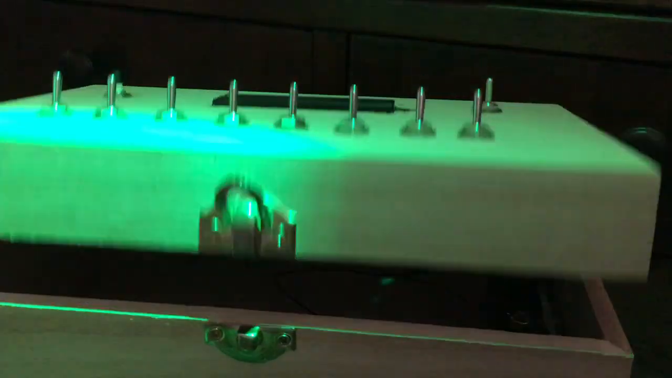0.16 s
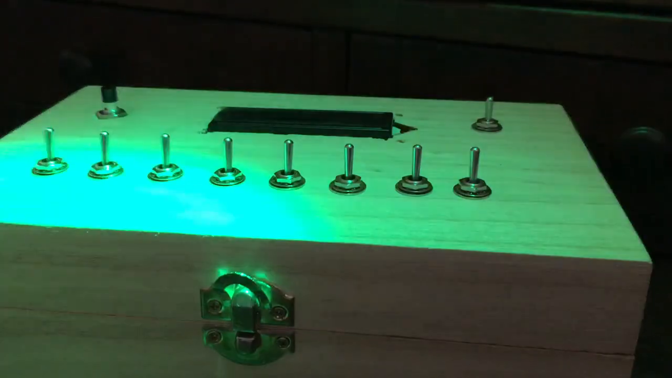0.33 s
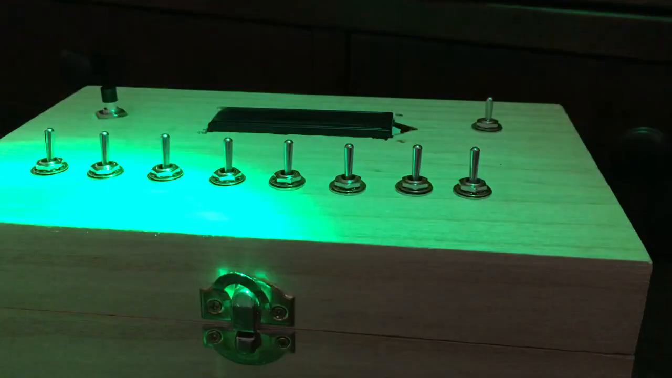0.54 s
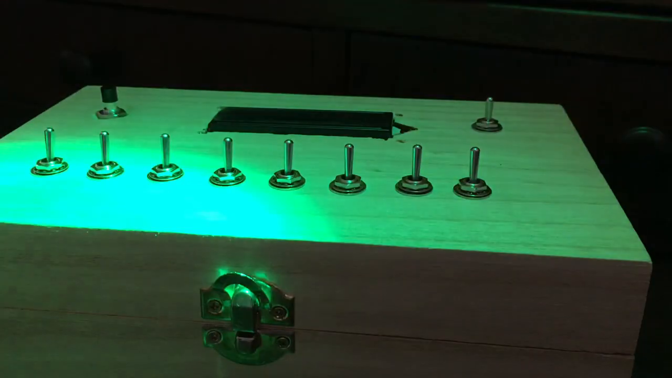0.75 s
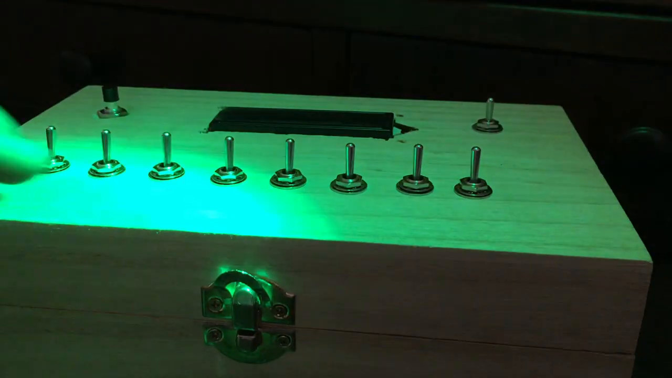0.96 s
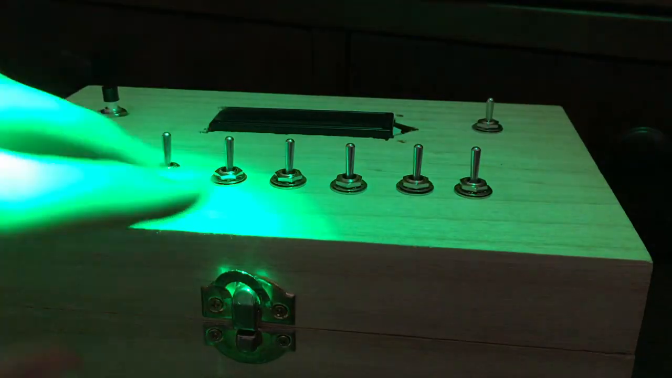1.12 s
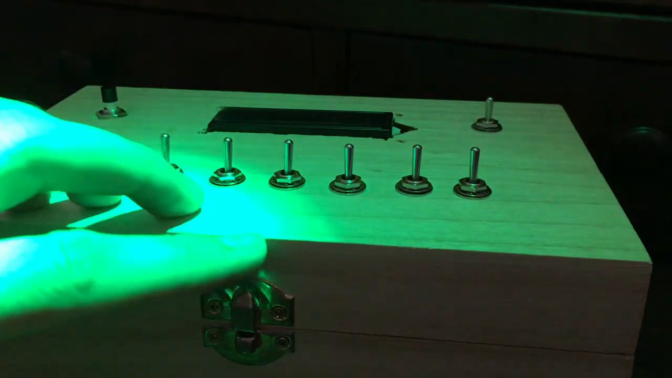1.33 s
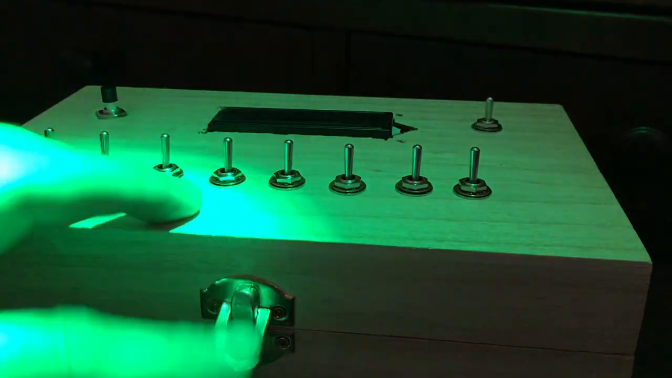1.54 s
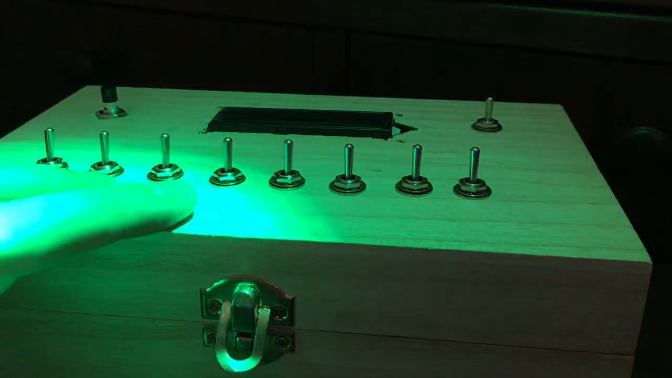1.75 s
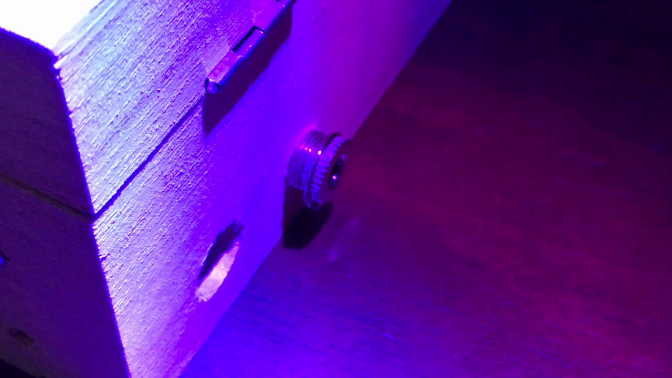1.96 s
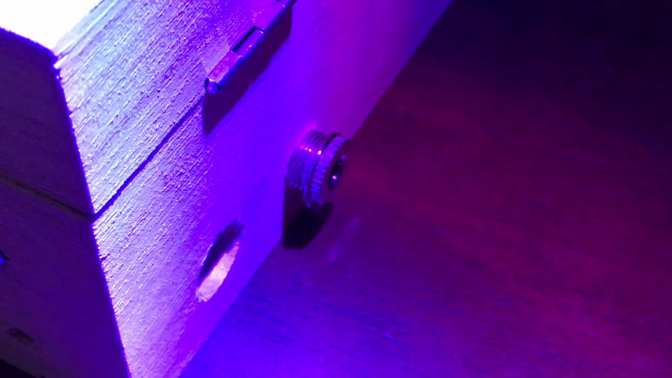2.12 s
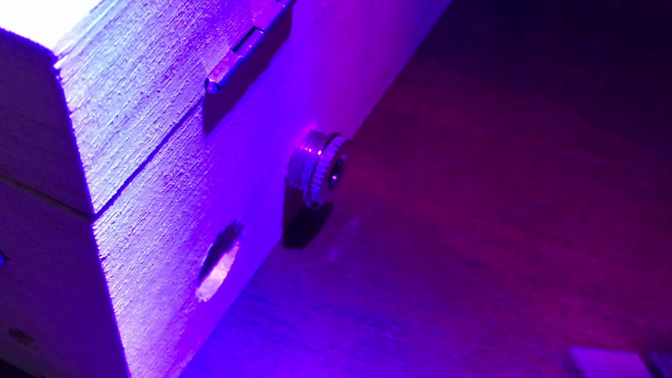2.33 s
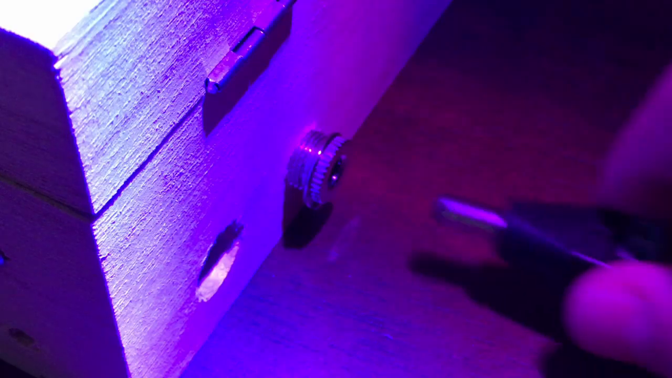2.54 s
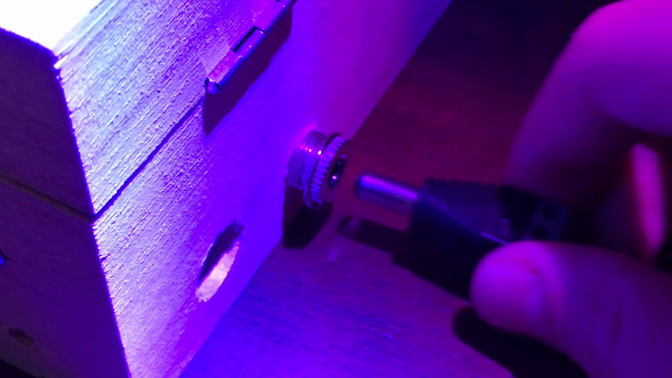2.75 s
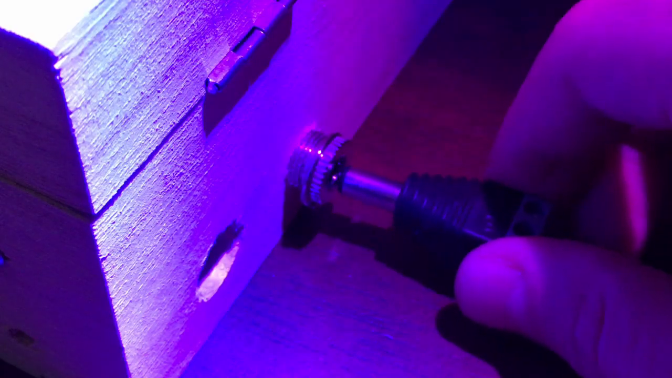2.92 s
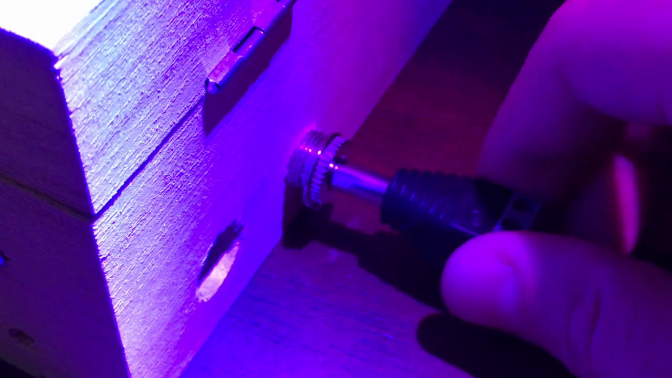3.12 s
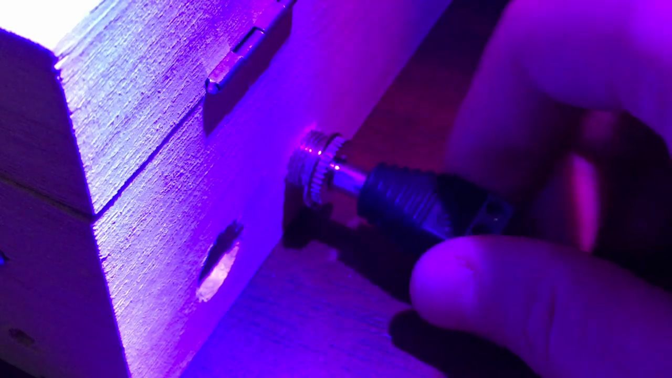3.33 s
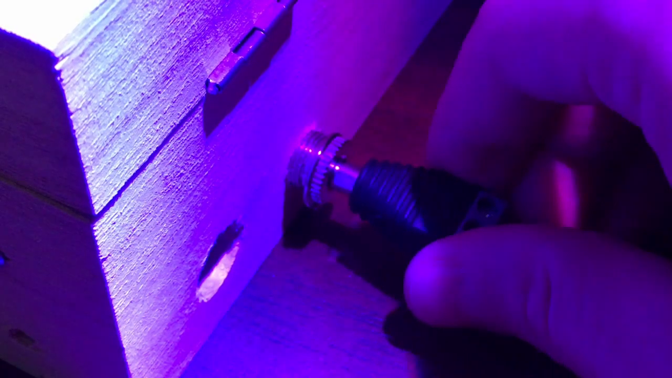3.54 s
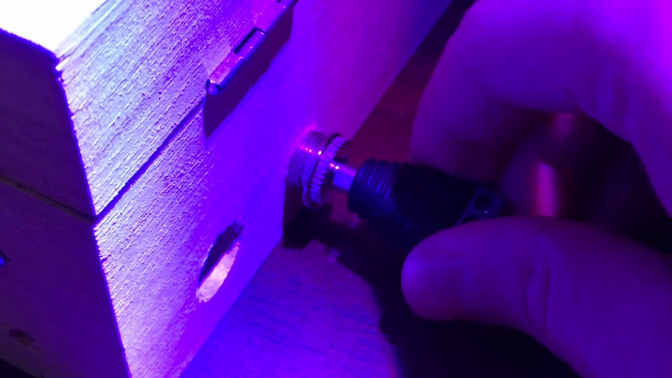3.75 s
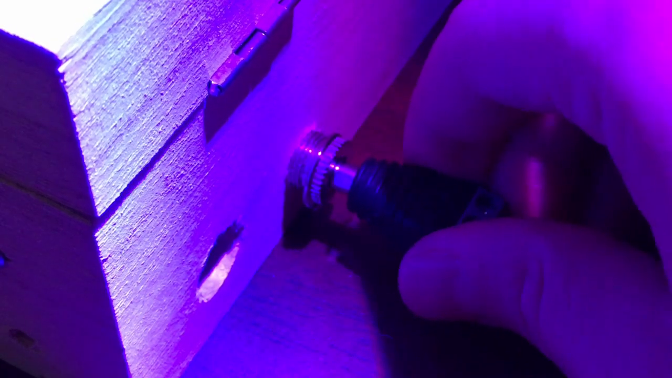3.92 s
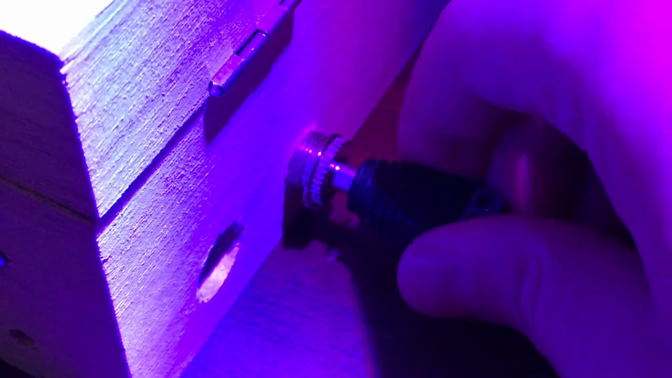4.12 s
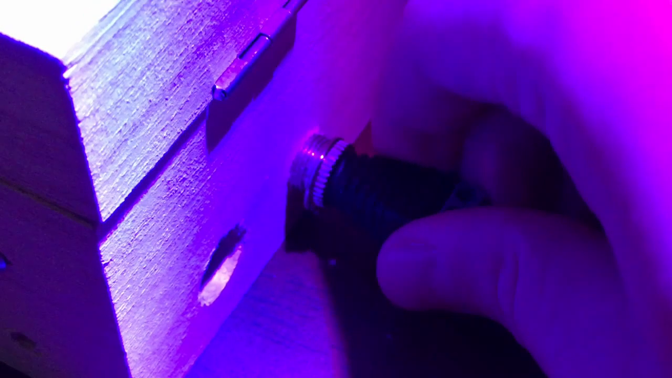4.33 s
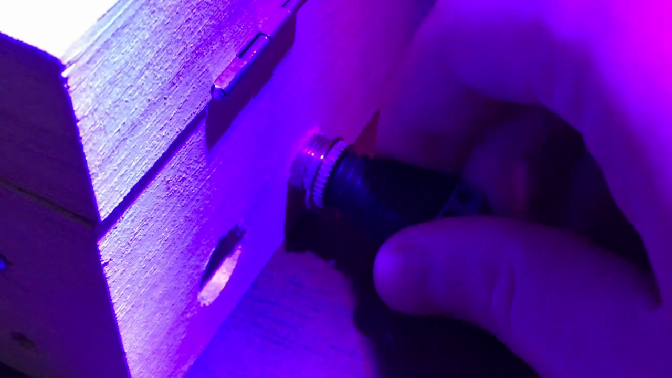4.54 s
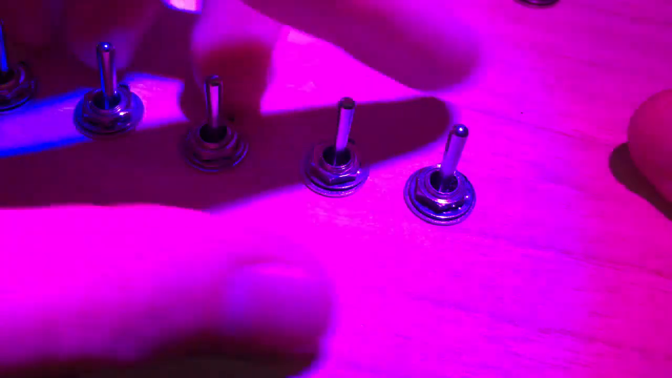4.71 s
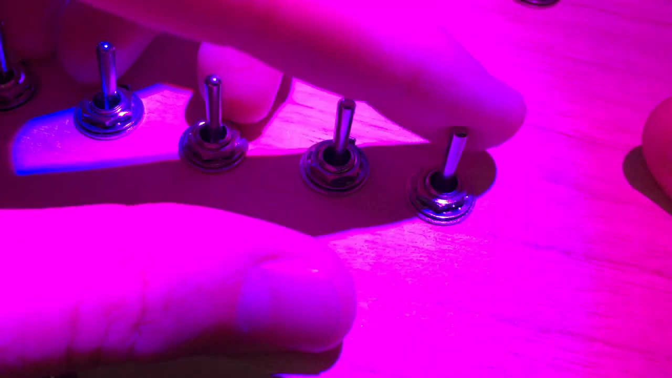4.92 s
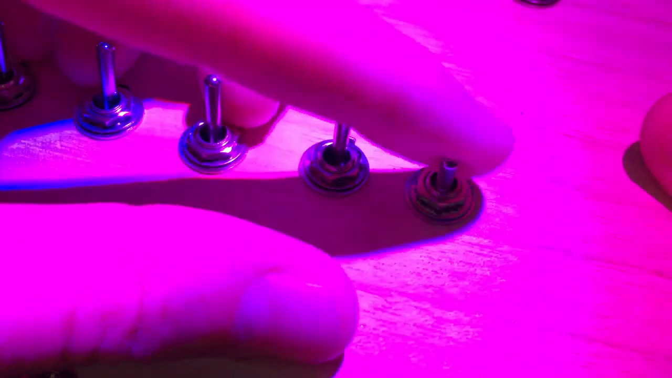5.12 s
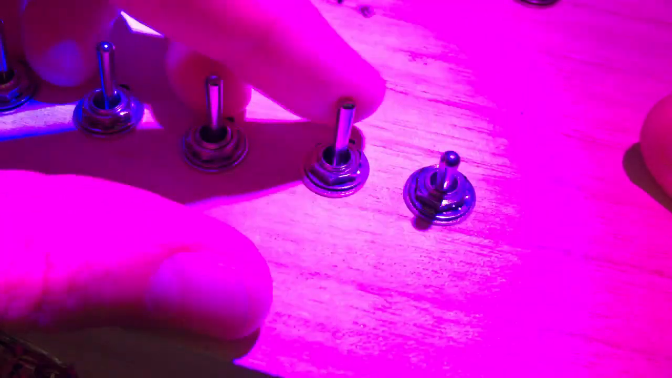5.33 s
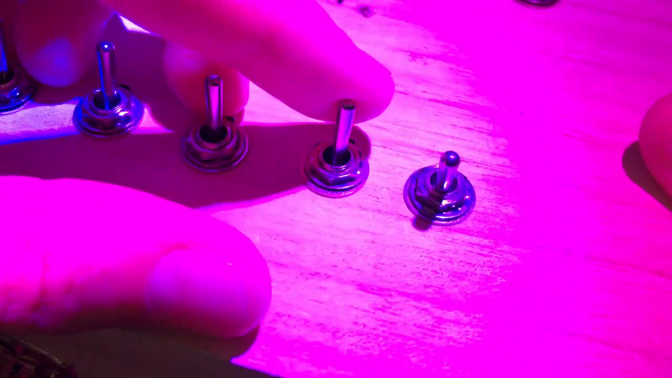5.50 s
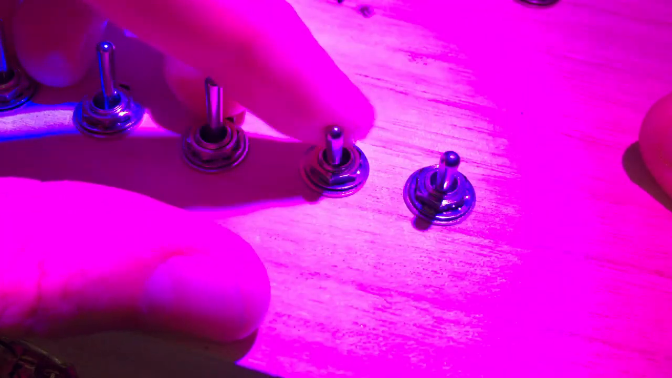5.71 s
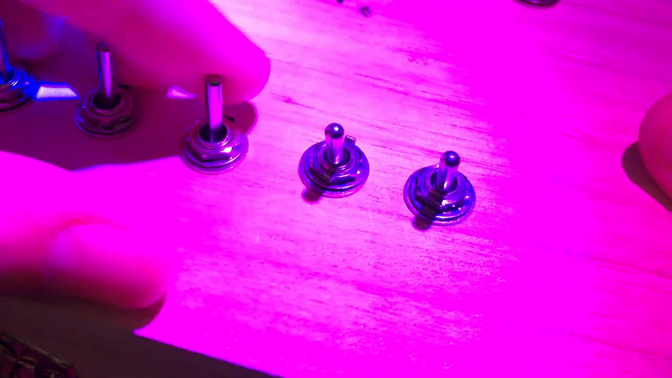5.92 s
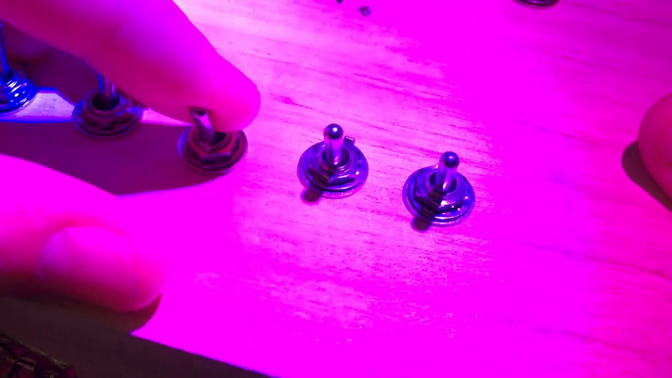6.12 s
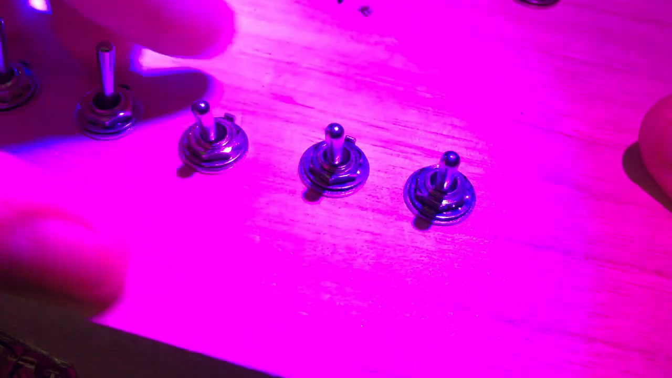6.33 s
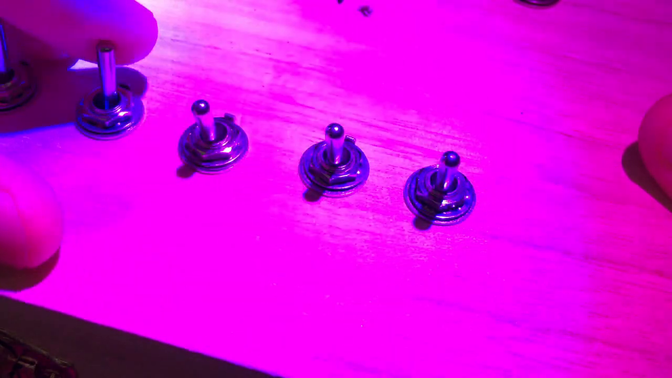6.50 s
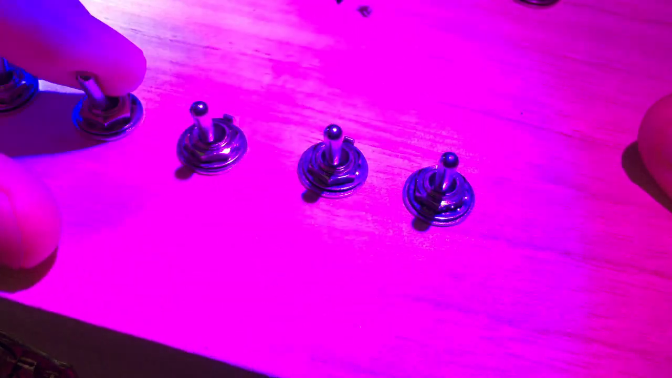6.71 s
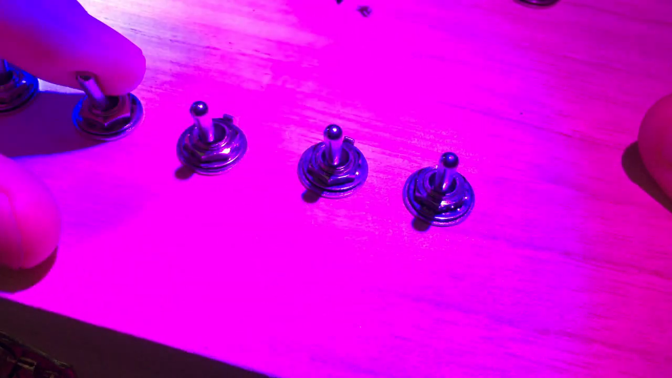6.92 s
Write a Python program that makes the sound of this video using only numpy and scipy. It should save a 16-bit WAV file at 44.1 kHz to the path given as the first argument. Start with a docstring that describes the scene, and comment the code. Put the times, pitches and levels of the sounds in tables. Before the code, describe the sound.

Close-up handling of a wooden electronics box: one hollow lid bang, small metal clicks, a plug pushed home, and six loud, uneven switch snaps.

```python
"""A wooden electronics box close by in a small quiet room. Its lid drops shut, its latch is closed, a plug is
worked into a socket in its wall and clicks twice as it catches, the plug slides home and four toggle switches
snap. Each blow is a burst of tiny impacts that rings the box. Shaped noise makes the fingers sliding, ticks,
scraping levers and air. Sparse random reflections make the room, and sine waves a faint hum. Loud blows raise
the hiss for a moment, and the level dips briefly at three times. Only the left channel carries sound."""
import sys
import numpy as np
from scipy import signal
from scipy.io import wavfile
from scipy.ndimage import uniform_filter1d

SR = 44100
rng = np.random.default_rng(int(sys.argv[2]) if len(sys.argv) > 2 else 0)


def output_pcm(signal):
    """Save a mono or channel-first signal as 16-bit PCM at the path in sys.argv[1].

    Samples are clipped to [-1, 1] before scaling.
    """
    pcm = np.clip(np.atleast_2d(signal).T, -1, 1) * 32767
    wavfile.write(sys.argv[1], SR, np.round(pcm).astype(np.int16))


N = 311346

# Snaps (two clicks of the plug catching, then four toggle switches), and the plug knocking about its socket.
# Both list (time [s], ring level [dB], extra weight [dB], extra brightness [dB], contact time scale [ms],
# struck spot [Hz])
SNAPS = [(3.706, -15, -12, -1.5, 3.4, 2290), (4.1041, -12.5, -14, -3.5, 4.55, 3350),
         (5.1137, -16, -4.5, 0, 3.3, 2525), (5.6786, -18.5, 1.5, 3.5, 2.6, 4710),
         (6.1712, -15, -1, -3.3, 2.97, 2146), (6.755, -15, 2.5, -4, 3.5, 2140)]
PLUG_KNOCKS = [(2.9418, -20.5, -7.5, -13, 1.4, 1244), (2.9884, -55, -17, 4.5, 3.3, 1355),
               (3.142, -40.5, 6, -14, 8.3, 1440), (3.1899, -43, 11, 8, 3.7, 1310),
               (3.2059, -17, -26, -2.5, 0.57, 1600), (3.297, -32, -2, -6, 1.3, 1742),
               (3.3108, -26, -26.5, 9.5, 4.9, 2650), (3.478, -50.5, 20, 12, 6.1, 1420),
               (3.4963, -53.5, 30, -1.5, 2.9, 1260)]

# Lid dropping, latch closing, plug sliding home. All list (time [s], ring level [dB], thump level [dB],
# knock level [dB], tick level [dB], sparkle level [dB], contact time scale [ms], struck spot [Hz])
LID_BLOWS = [(0.397, -12, -18.5, -11.5, -16, -46, 1.8, 1900)]
LATCH_BLOWS = [(1.3868, -45.5, -38, -29, -72, -75, 2.6, 560),
               (1.6746, -22, -58, -33.5, -25, -31.5, 4.1, 2468)]
PLUG_SEATING = [(4.298, -29, -47, -20, -35, -45, 13.2, 2300),
                (4.3063, -14.5, -9, -24, -31.5, -45.5, 3, 1440)]

# Fingertips landing on the box: (time [s], ring level [dB], extra weight [dB], extra brightness [dB])
FINGER_TAPS = [(0.0873, -54.5, 1.5, 3.5), (0.3071, -63, 2, -6.5), (0.9506, -78, 29.5, 7),
               (2.351, -71.5, 3, -5), (3.98, -72, 14.5, -8), (4.748, -54.5, 0, 1), (5.2102, -49, 3, -11),
               (5.2445, -50, -6, 6.5), (5.5141, -66.5, 7.5, -0.5), (5.888, -58, -6, 2),
               (6.2963, -61, 6.5, -1), (6.3746, -46.5, -14, 2), (6.812, -61, 11.5, 4)]
FINGER_CONTACT_MS, FINGER_SPOT_HZ = 2.8, 342

# Balance of a blow's parts:
# (thump over ring [dB], knock over ring [dB], tick over ring [dB], sparkle over ring [dB],
#  share of the extra weight that reaches the knock [0-1])
SWITCH_BALANCE = (-11.5, -7, 4, -0.5, 0.27)
PLUG_BALANCE = (-24.5, -2, -23.5, -48, 0.526)
FINGER_BALANCE = (12.5, 9.5, -5, -19, 0.824)

# Ringing tones of the box's top, shell and wall before each blow detunes them:
# (pitch [Hz], strength within its band [dB], time to fall by 60 dB [s])
TOP_MODES = [(84, -25, 0.072), (271.2, 13.5, 0.093), (354, 9.5, 0.053), (560, -8.5, .04), (706, 5, 0.034),
             (884, 1, 0.044), (1539.5, 0.5, 0.046), (1747, -2, 0.053), (2070, 11.5, 0.0077),
             (2181, -9.5, 0.074), (2600, 1.5, 0.019), (3390, -6.5, 0.013), (4030, -6, 0.012),
             (4505, -6, 0.02), (5630, -5.5, 0.018), (6320, -1, 0.011), (7750, -12, 0.0097),
             (8200, -5.5, 0.0056), (8670, 7, 0.022), (9650, 8, 0.013), (11420, 10, 0.014),
             (11700, -14, 0.011)]
SHELL_MODES = [(76.5, -11, 0.15), (125, -9.5, 0.071), (204, -3.5, 0.15), (315.8, -8.5, 0.21),
               (520, -7, .06), (679, 7, 0.083), (790, -1, 0.18), (1295, 4.5, 0.006), (1480, 0, 0.017),
               (2290, -6, 0.011), (2531, -12.5, 0.051), (3350, 2, 0.0089), (4800, -6, 0.01),
               (6100, 5, 0.005), (6160, -20, .012), (7900, 2, .01), (9280, -0.5, .01), (12100, -2, .01)]
WALL_MODES = [(75.3, 6.5, 0.023), (124, -6.5, 0.04), (194, -10, 0.067), (314, -10.5, 0.12),
              (510, -6.5, 0.019), (647.5, 4.5, 0.045), (900, 0.5, 0.022), (1314, 0.5, 0.029),
              (1414, -9, 0.059), (1712, -10, 0.071), (2310, -11, 0.031), (2430, 0, 0.024),
              (3140, 7.5, .015), (4644, 2.5, 0.015), (5900, -12, 0.011), (7320, 3.5, 0.006),
              (8500, -16.5, .01), (12000, 0, .01)]
DETUNE_SPREAD = .03  # full width of the random pitch shift, as a share of the pitch

# Borders of the thump, knock, ring, tick and sparkle bands: (border [Hz], ...)
BAND_EDGES = (50, 400, 1100, 3000, 7000, 15000)

# Skin and metal sliding: (start [s], length [s], place of the firmest pressure [0-1], level there [dB])
STROKES = [(.055, 0.045, 0.56, -59.5), (.355, 0.039, 0.96, -48.5), (.885, 0.095, 0.6, -71),
           (1.61, 0.12, 0.46, -49), (3.26, .166, 0.3, -60), (3.43, 0.061, 0.33, -62.5),
           (3.5, 0.22, 0.7, -67), (4.665, 0.063, .15, -70), (4.742, 0.19, 0.4, -63.5),
           (4.89, .06, 0.5, -76), (4.955, 0.048, 0.45, -66.5), (5.86, 0.2, 0.32, -61.5),
           (6.39, 0.18, .2, -60)]
# Level at each end below the firmest point; low part over high part
STROKE_START_DB, STROKE_END_DB, STROKE_LOW_DB = -16, -17, 5

# Broad resonances of skin on wood (first two) and on metal:
# (centre [Hz], width of the narrower of two filters [Hz], strength within its group [dB])
RUB_BANDS = [(785, 430, -2), (2070, 300, 1), (5300, 2400, 5), (8600, 3000, -2), (13000, 3500, -12)]

# Faint dry ticks of hinge, wires and switch springs: (time [s], level [dB], rough centre [Hz])
TICKS = [(0.0203, -62.5, 3300), (0.0747, -51.5, 3350), (0.207, -51.5, 7900), (0.232, -49.5, 4000),
         (0.2776, -56, 4500), (0.3436, -42, 7220), (2.9644, -58.5, 3360), (3.0678, -57.5, 3630),
         (3.846, -48, 4360), (4.3287, -35.5, 3350), (4.4705, -54, 3140)]

# How fast the room's echoes die: (frequency [Hz], time to fall by 60 dB [s])
ROOM_DECAY = [(60, 0.21), (250, 0.59), (700, 0.47), (2000, 0.35), (5000, 0.34), (10000, 0.19),
              (16000, 0.05)]

# Colour of the room tone: (frequency [Hz], relative level per Hz [dB])
AIR_SPECTRUM = [(15, -39), (25, -3), (53, -1.5), (80, -8), (114, -4), (166, -4), (185, -20), (236, -10.5),
                (293, -14), (363, -23.5), (796, -35), (1160, -36), (1940, -37.5), (2110, -42.5),
                (16000, -60.5)]
AIR_GAIN_DB = -48  # for what is left after the low end is taken out
RUMBLE_DB, RUMBLE_SWELL_DB = -54.5, 1.2  # middle level of the low end, and its typical wander

# Hum of a small motor somewhere: (pitch before it wavers [Hz], level [dB])
HUM_TONES = [(53.8, -66.5), (118.4, -64), (156.1, -69), (236.9, -62.5), (258.4, -77), (1174, -80)]

# Colour of the extra hiss after loud blows: (frequency [Hz], relative level per Hz [dB])
HISS_SPECTRUM = [(600, -17.5), (1500, -1), (3000, -7), (5000, -9), (9000, -13.5), (13000, -18),
                 (16000, -22.5)]
HISS_DB = -63

# Moments when the level dips: (time [s], ...)
DIPS = (2.02, 4.635, 7.0)
TREBLE_LIMIT_HZ = 16300


def amp(db):
    """Turns decibels into a multiplier."""
    return 10 ** (np.asarray(db) / 20)


def evened(x):
    """Scales a sound to an average strength (rms) of 1."""
    return x / np.sqrt(np.mean(x ** 2) + 1e-20)


def read(points, hz):
    """Reads a table between its points, with frequency on a log scale as the ear hears it."""
    f, value = np.transpose(points)
    return np.interp(np.log(hz + 1), np.log(f + 1), value)


def add(mix, s, sound):
    """Mixes a sound in, starting at s seconds."""
    part = mix[round(s * SR):][:len(sound)]
    part += sound[:len(part)]


def balanced(row, balance):
    """Spreads a blow's strength, weight and brightness over the five parts of its sound."""
    s, ring_db, weight_db, bright_db, contact_ms, spot_hz = row
    thump_db, knock_db, tick_db, sparkle_db, share = balance
    thump_db += ring_db + weight_db
    knock_db += ring_db + share * weight_db
    tick_db += ring_db + bright_db
    sparkle_db += ring_db + bright_db
    return s, ring_db, thump_db, knock_db, tick_db, sparkle_db, contact_ms, spot_hz


def box():
    """All blows on the box: as heard straight on, and as sent into the room."""
    mix = np.zeros((2, N))
    for row in SNAPS:
        blow(mix, balanced(row, SWITCH_BALANCE), TOP_MODES, lag_ms=3.0, rise=0.13, rattle=0.74,
             rattle_t60=0.034, bounce_ms=11.0, bounce_db=-18.5, sent_ring=1.0, sent_db=-4.3)
    for row in LID_BLOWS:
        blow(mix, row, SHELL_MODES, lag_ms=0.45, rise=0.007, rattle=0.57,
             rattle_t60=0.062, bounce_ms=6.6, bounce_db=-18.0, sent_ring=0.2, sent_db=-2.5)
    for row in LATCH_BLOWS:
        blow(mix, row, TOP_MODES, lag_ms=1.08, rise=0.027, rattle=0.87,
             rattle_t60=0.017, bounce_ms=6., bounce_db=-12.5, sent_ring=0.61, sent_db=-6.5)
    for row in PLUG_KNOCKS:
        blow(mix, balanced(row, PLUG_BALANCE), WALL_MODES, lag_ms=1.2, rise=0.1, rattle=0.74,
             rattle_t60=0.03, bounce_ms=8.3, bounce_db=-18.5, sent_ring=2.5, sent_db=-10.5)
    for row in PLUG_SEATING:
        blow(mix, row, WALL_MODES, lag_ms=3.33, rise=0.088, rattle=0.72,
             rattle_t60=0.027, bounce_ms=10.0, bounce_db=-18.0, sent_ring=0.67, sent_db=-4.0)
    for row in FINGER_TAPS:
        full_row = (*row, FINGER_CONTACT_MS, FINGER_SPOT_HZ)
        blow(mix, balanced(full_row, FINGER_BALANCE), TOP_MODES, lag_ms=1.0, rise=0.54, rattle=0.47,
             rattle_t60=0.084, bounce_ms=8.4, bounce_db=-14.5, sent_ring=0.74, sent_db=-8.0)
    return mix


def blow(mix, row, modes, lag_ms, rise, rattle, rattle_t60, bounce_ms, bounce_db, sent_ring, sent_db):
    """A burst of tiny impacts rings the modes; wood answers later than metal, and the part bounces once."""
    s, ring_db, thump_db, knock_db, tick_db, sparkle_db, contact_ms, spot_hz = row
    ms = np.arange(1500) * 1000 / SR
    t = np.arange(9000) / SR
    grit = rng.standard_normal((len(BAND_EDGES) - 1, len(ms)))
    phases, detune = rng.random((2, len(modes)))
    grit *= amp(1.3 * rng.standard_normal(len(ms)))  # a few impacts stand out
    dense = rng.standard_normal(len(t))
    spot = signal.iirpeak(spot_hz, 4.5, SR)  # the struck spot lifts the modes near its own pitch

    for k, db in enumerate((thump_db, knock_db, ring_db, tick_db, sparkle_db)):
        low_hz, high_hz = BAND_EDGES[k], BAND_EDGES[k + 1]
        metal = k / 4  # from wood (0) in the lowest band to metal (1) in the highest

        # Push of the blow: it comes later in wood and is shorter in metal
        u = np.maximum(ms - lag_ms * (1 - metal), 0) / (contact_ms * (1 - 0.49 * metal))
        force = u ** (rise * contact_ms) * np.exp(-2 * u) * grit[k]
        force += amp(bounce_db) * np.roll(force, round(bounce_ms * SR / 1000))
        if k < 2:  # slow modes feel the burst as one push
            force = abs(force)

        # Clear tones of this band
        tones = np.zeros(len(t))
        for (hz, mode_db, t60), phase, d in zip(modes, phases, detune):
            if low_hz <= hz < high_hz:
                shifted_hz = hz * (1 + DETUNE_SPREAD * (d - .5))
                start = phase if k > 1 else 0  # radians
                tones += amp(mode_db - 60 * t / t60) * np.sin(2 * np.pi * shifted_hz * t + start)
        # Countless weak modes, heard as a rattle that is shorter in metal
        weak = dense * amp(-60 * t / (rattle_t60 * (1 - 0.55 * metal)))

        band = signal.butter(3, [low_hz * .9, high_hz * 1.1], "band", fs=SR, output="sos")
        ring = evened(signal.sosfilt(band, signal.oaconvolve(force, tones)))
        loose = evened(signal.sosfilt(band, signal.oaconvolve(force, weak)))
        sound = ring + rattle * min(0.13 + 2.5 * metal, 1) * loose
        sound += 2.2 * signal.lfilter(*spot, sound)
        gain = amp(db) / np.sqrt(uniform_filter1d(sound ** 2, size=300).max())  # sets the loudest moment
        add(mix[0], s, gain * sound)

        # Summed over all directions the peaks blur, so a bare click joins what goes into the room
        smooth = evened(signal.sosfilt(band, signal.unit_impulse(len(ring))))
        smooth += 2.5 * signal.lfilter(*spot, smooth)
        sent = sent_ring * (1 - metal ** 2) * ring + min(0.3 + 3.0 * metal, 1) * smooth
        add(mix[1], s, gain * amp(sent_db) * min(0.44 + 1.3 * metal, 1) * sent)


def lever_travel():
    """Before each snap a spring ticks as it tips over centre, then the part scrapes ever harder until it snaps
    home."""
    mix = np.zeros(N)
    ms = np.arange(-940, 0) * 1000 / SR  # time up to the snap at 0
    for s, ring_db, *_ in SNAPS:
        grit = signal.lfilter(*signal.butter(1, [900, 7000], "band", fs=SR), rng.standard_normal(len(ms)))
        tip = amp(-33.5) * np.exp(-(ms - ms[0]) / 2) * rng.standard_normal(len(ms))
        scrape = amp(-15.5 + 1.9 * ms) * grit
        add(mix, s + ms[0] / 1000, amp(ring_db) * (tip + scrape))
    return mix


def rubs():
    """Uneven slips through the broad resonances of skin on wood and metal; each stroke presses in and eases off."""
    unevenness = evened(uniform_filter1d(rng.standard_normal(N), size=150))
    slips = rng.standard_normal(N) * amp(3.0 * unevenness)
    bands = []
    for hz, width, db in RUB_BANDS:
        broad = signal.lfilter(*signal.iirpeak(hz, hz / width / 2, SR), slips)
        bands.append(amp(db) * signal.lfilter(*signal.iirpeak(hz, hz / width, SR), broad))
    low, high = evened(sum(bands[:2])), evened(sum(bands[2:]))

    level, t = np.zeros(N), np.arange(N) / SR
    for s, length, firmest, db in STROKES:
        u = (t - s) / length  # progress through the stroke, 0-1
        pressure_db = np.interp(u, (0, firmest, 1), (STROKE_START_DB, 0, STROKE_END_DB))
        level += ((u > 0) & (u < 1)) * amp(db + pressure_db)
    return uniform_filter1d(level, size=300) * (high + amp(STROKE_LOW_DB) * low)


def ticks():
    """Each tick is a short puff of grit, broad around its centre."""
    mix, ms = np.zeros(N), np.arange(900) * 1000 / SR
    for s, db, hz in TICKS:
        puff = rng.standard_normal(len(ms)) * (np.exp(-ms / 1.4) + 0.11 * np.exp(-ms / 2.0))
        band = signal.butter(1, [hz * 0.21, min(hz * 1.9, 17000)], "band", fs=SR)
        broad = signal.lfilter(*band, puff)
        add(mix, s, amp(db) * broad / np.sqrt(uniform_filter1d(broad ** 2, size=200).max()))
    return mix


def room(x):
    """Sparse reflections of random sign, each band dying at its own speed; three tails take turns."""
    taps = np.zeros((3, SR // 2))
    grid = np.arange(300, SR // 2 - 20, 20)  # one reflection in every 20 samples
    at = grid + rng.integers(0, 20, (3, len(grid)))
    np.put_along_axis(taps, at, rng.choice([-1., 1.], at.shape), 1)
    hz, t, z = signal.stft(taps, SR, nperseg=256)
    fading = amp(-60 * t / read(ROOM_DECAY, hz)[:, None])
    tails = signal.istft(z * fading, SR, nperseg=256)[1]

    turn = np.pi * np.arange(N) / SR * .9
    echoes = np.zeros(N)
    for k, tail in enumerate(tails):
        share = np.sqrt(2 / 3) * np.cos(turn + k * np.pi / 3)  # the three powers add up to 1
        echoes += signal.oaconvolve(x * share, tail / np.linalg.norm(tail))[:N]
    return echoes


def noise(spectrum, patchy_db):
    """Steady noise of a given colour, made from random spectra with drifting patches."""
    hz = np.fft.rfftfreq(2048, 1 / SR)
    a, b, patches = rng.standard_normal((N // 512 + 5, len(hz), 3)).T
    patches = uniform_filter1d(patches, size=12, axis=0)  # blurred over frequency
    patches = evened(uniform_filter1d(patches, size=8, axis=1))  # blurred over time
    z = (a + 1j * b) * amp(read(spectrum, hz)[:, None] + patchy_db * patches)
    return evened(signal.istft(z, nperseg=2048, noverlap=1536)[1][:N])


def air():
    """Room tone: soft noise whose low end wanders, and a faint wavering hum."""
    tone = noise(AIR_SPECTRUM, patchy_db=.7)
    low = signal.sosfiltfilt(signal.butter(2, 400, fs=SR, output="sos"), tone)
    wander = evened(uniform_filter1d(rng.standard_normal(N), size=12000))
    rumble = amp(RUMBLE_DB + RUMBLE_SWELL_DB * wander) * evened(low)

    drift = evened(uniform_filter1d(rng.standard_normal(N), size=8000))
    waver = np.cumsum(1 + .004 * drift) / SR  # time that runs slightly unevenly bends the pitch
    hum = sum(amp(db) * np.sin(2 * np.pi * (hz * waver + rng.random())) for hz, db in HUM_TONES)
    return amp(AIR_GAIN_DB) * (tone - low) + rumble + hum


def scene():
    """The box in its room, on the left channel."""
    straight, sent = box()
    small = ticks() + rubs() + lever_travel()
    left = straight + small + amp(-11.0) * room(sent + small) + air()
    return np.array([left, np.zeros(N)])


def record(dry):
    """A loud peak holds a noisier input range for a moment; then brief dips, soft overload and band limits."""
    t, index = np.arange(N) / SR, np.arange(N)
    last_loud = np.maximum.accumulate(np.where(abs(dry[0]) > .5, index, -SR))
    stretch = np.searchsorted(DIPS, t)  # counts the dips so far
    # The hiss holds for 0.41 s after a loud peak, but not past a dip
    held = (index - last_loud < .41 * SR) & (stretch == stretch[np.maximum(last_loud, 0)])
    hiss = noise(HISS_SPECTRUM, patchy_db=.3)
    left = dry[0] + amp(HISS_DB) * hiss * uniform_filter1d(held * 1., size=300)
    for s in DIPS:
        left = left * (1 - 0.87 * np.exp(-((t - s) / 0.0064) ** 2))
    left = signal.lfilter(*signal.butter(2, 40, "high", fs=SR), left)  # the microphone drops the lowest bass
    left = np.tanh(left / .98) * .98  # soft overload
    treble_limit = signal.firwin(511, TREBLE_LIMIT_HZ, window=("kaiser", 9), fs=SR)
    left = signal.oaconvolve(left, treble_limit, "same")
    return np.array([left, dry[1]])


dry = scene()
out = record(dry)
output_pcm(out)
```